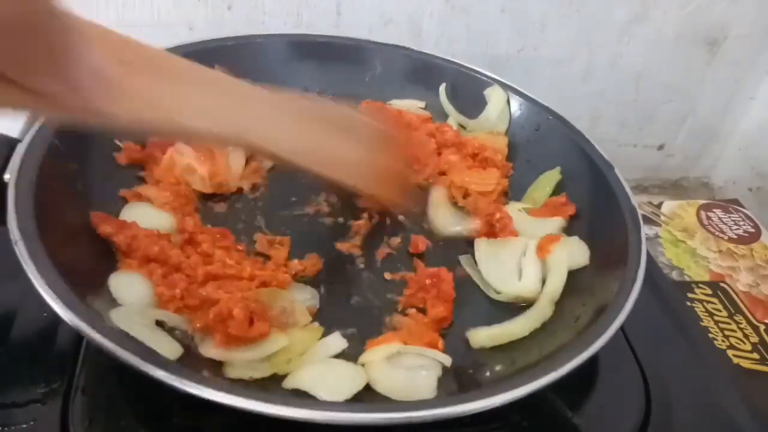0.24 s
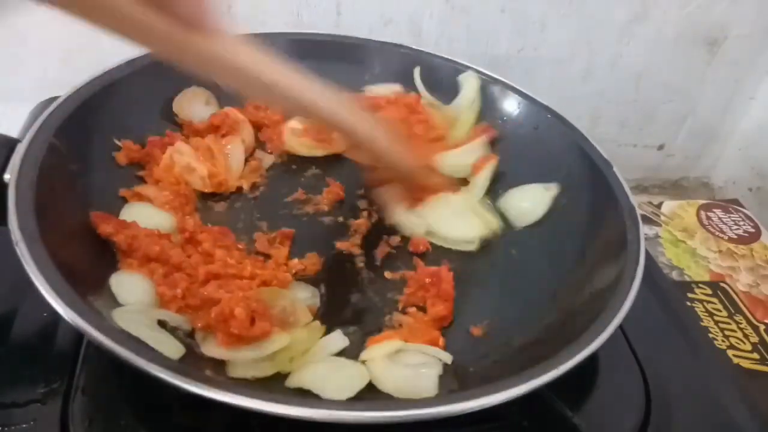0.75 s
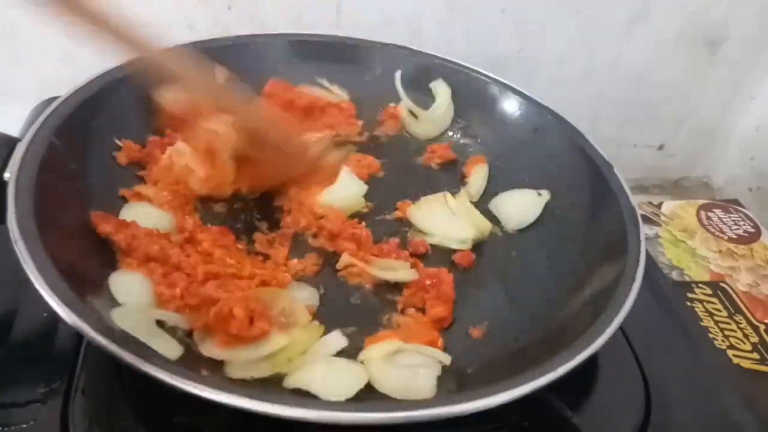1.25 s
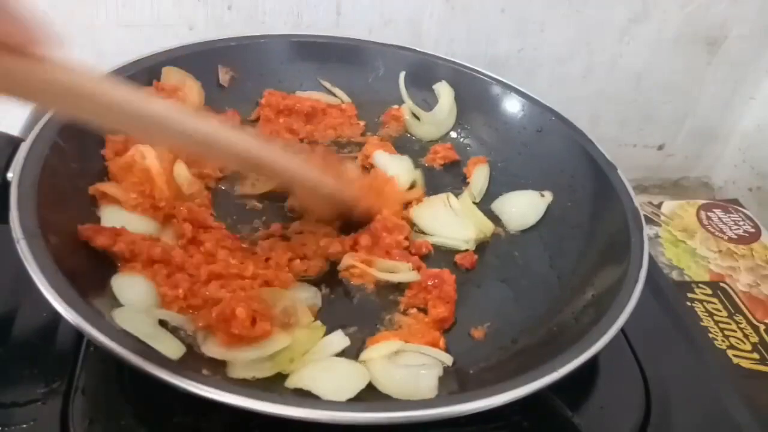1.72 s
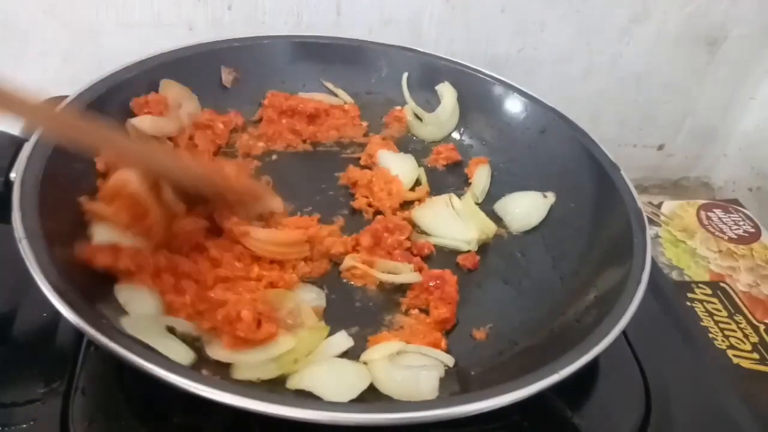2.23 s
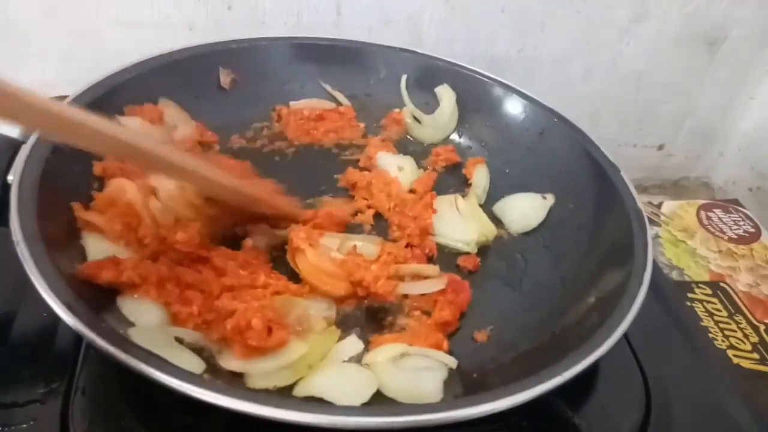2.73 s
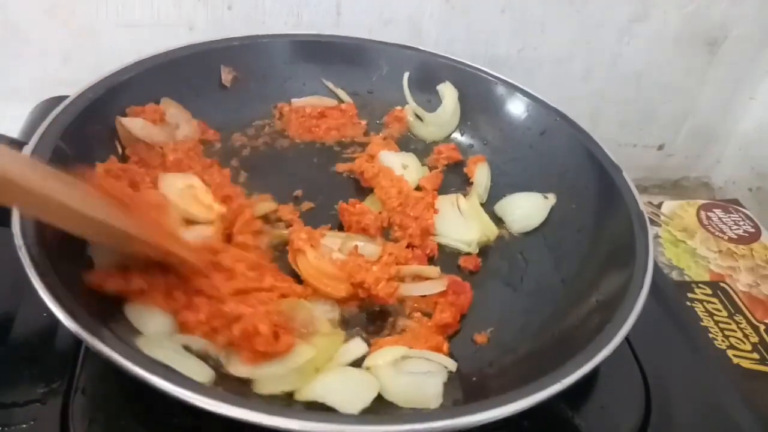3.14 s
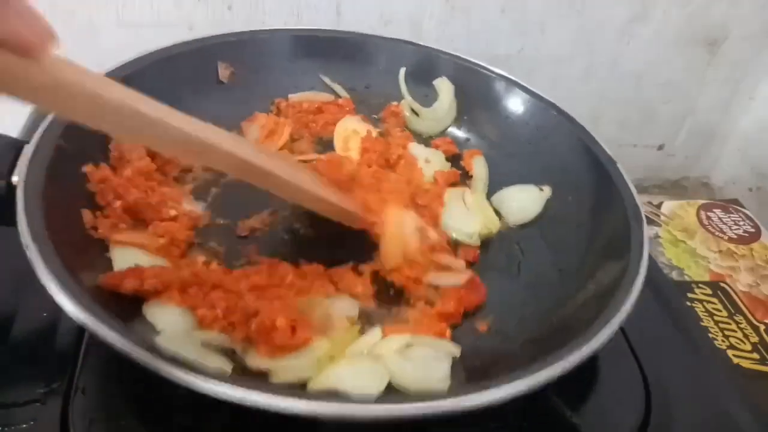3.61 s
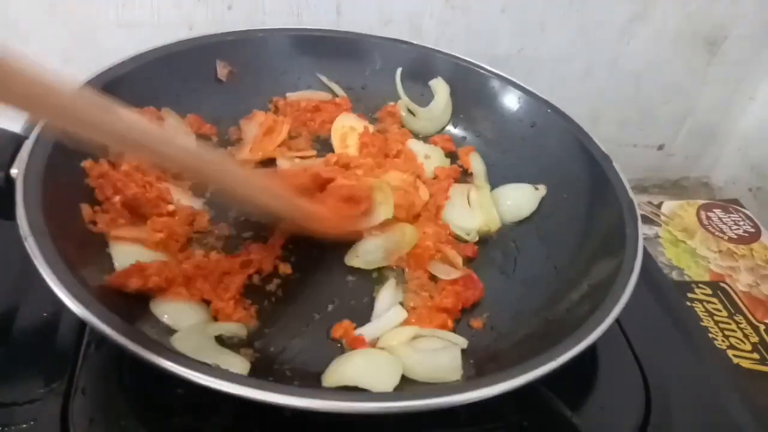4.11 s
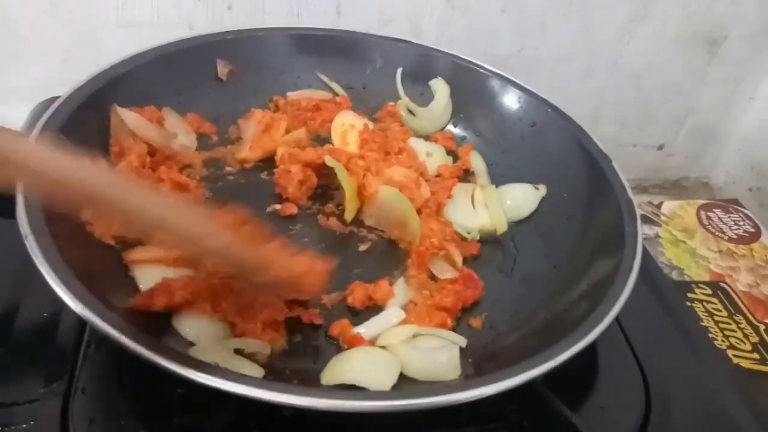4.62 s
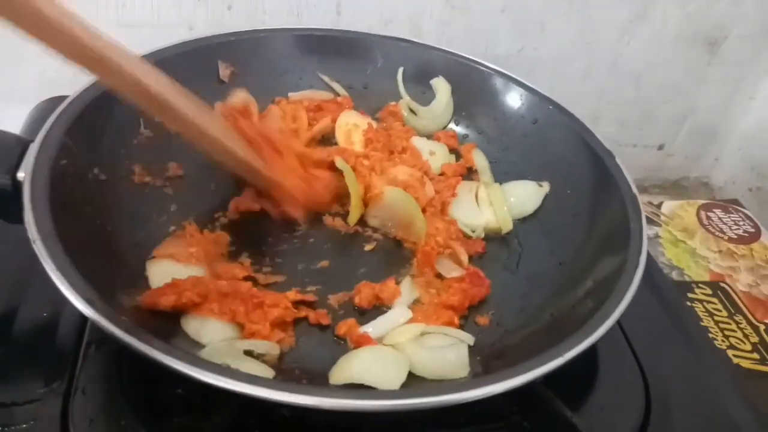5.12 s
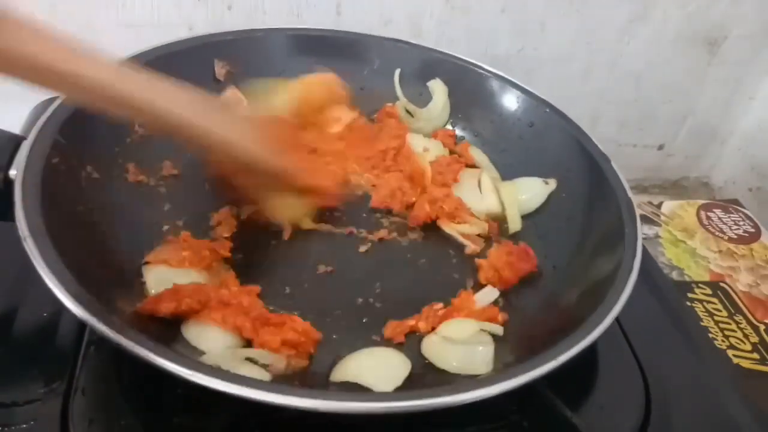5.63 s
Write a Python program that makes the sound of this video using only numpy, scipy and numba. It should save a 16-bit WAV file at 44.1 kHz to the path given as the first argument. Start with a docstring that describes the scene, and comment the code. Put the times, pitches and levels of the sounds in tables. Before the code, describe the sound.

A wooden spatula knocks and scrapes in a wok while food sizzles lightly over a low gas burner rumble.

```python
"""Stir-fry in a wok

Onions and chilli paste fry in a non-stick wok over a rumbling gas burner in a small hard-walled kitchen.
A wooden spatula knocks the pan into ringing, thuds through the food and scrapes over the coating.
Tiny steam bubbles burst in the oil, flaring when the food is turned, and larger drops spit.
A phone close by holds the knocks down with its limiter."""
import sys
import numpy as np
from scipy import signal
from scipy.fft import rfft, irfft
from scipy.io import wavfile
from scipy.ndimage import uniform_filter1d, minimum_filter1d
from numba import njit

SR = 44100
rng = np.random.default_rng(int(sys.argv[2]) if len(sys.argv) > 2 else 0)


def dump_mix(stems):
    """Bounce the given channels to the path in sys.argv[1] as a 16-bit WAV at rate SR."""
    frames = np.atleast_2d(stems).T  # one column per channel
    limited = np.clip(frames, -1, 1)  # hard clip at full scale
    pcm = np.round(limited * 32767).astype(np.int16)
    wavfile.write(sys.argv[1], SR, pcm)


N = 258426
T = np.arange(N) / SR

# Spatula hits. Each row: start in seconds, levels in dB of the blade's flat, its edge and the pan's ring,
# favoured pitch in Hz, ring length (1 rings free, less is choked).
KNOCK_CUES = [(0.2014, -18.5, -10.5, -19.5, 272, 1.0), (0.3502, -10, -42, -20.5, 668, 0.86),
              (0.8232, -12, -20, -21.5, 404, 1.0), (0.8616, -20, -27, -22.5, 280, 0.54),
              (1.247, -11, -23.5, -19.5, 201, 0.83), (1.282, -20, -32, -21.5, 597, 0.78),
              (2.238, -27.5, -35, -29.5, 390, 0.74), (2.6399, -7, -24, -20, 630, 1.0),
              (2.6818, -24.5, -38, -25, 280, 0.81), (3.2611, -28, -24.5, -23.5, 400, 0.5),
              (3.355, -10.5, -25, -20.5, 226, 0.92), (3.3953, -17, -48, -25, 226, 0.83),
              (3.657, -27, -27.5, -25, 226, 0.62), (3.741, -8.5, -23, -16, 350, 0.93),
              (4.0733, -32, -16, -22, 273, 0.97), (4.1258, -7.5, -46, -15.5, 212, 0.77),
              (4.539, -14, -50, -19, 210, 0.9), (5.0747, -14.5, -35, -20.5, 404, 0.69),
              (5.566, -35, -25, -25.5, 226, 0.42), (5.6493, -10.5, -38, -18.5, 417, 0.87)]
# Hits cushioned by food. Each row: start in seconds, level in dB, favoured pitch in Hz.
THUD_CUES = [(0.172, -23.5, 333), (0.184, -28, 252), (2.451, -32.5, 234), (2.623, -26, 366),
             (3.498, -29, 326), (4.231, -22.5, 600), (5.097, -28, 406), (5.373, -41, 650)]
# The voice of the pan. Each row: pitch in Hz, level in dB, free ring time (t60) in seconds.
PAN_MODES = [(94, -12, .5), (226, -3, .35), (273, -5, .3), (345, -3.5, .28), (402, -1.5, .33),
             (432, -7, .25), (470, -8, .22), (512, -10, .22), (577, -6, .28), (656, -2, .24),
             (716, -2, .25), (781, -12, .3), (890, -12, .3), (1000, -14, .25), (1150, -13, .28),
             (1287, -11, .33), (1490, -10, .35), (1675, -2, .27), (1720, -5, .25), (1812, -4, .24),
             (1840, -5, .21), (1881, -4, .22), (1960, -8, .18), (2158, -12, .4), (2355, -14, .25),
             (2660, -17, .25), (2835, -14, .25), (2880, -15, .25), (3290, -13, .25)]
# The wooden blade struck flat, then on its edge. Each row: pitch in Hz, level in dB, t60 in seconds.
BLADE_FLAT_MODES = [(1799, 6.5, 0.016), (3020, -36, .012), (4086, -11, 0.014)]
BLADE_EDGE_MODES = [(2268, 12, 0.0099), (2887, -13, 0.1)]
# Pushes through the food. Each row: start in seconds, length in seconds, scrape in dB, pan rub in dB.
STROKE_CUES = [(0.0, 0.2, -63, -50), (0.58, 0.21, -55.5, -51.5), (1.42, 0.84, -56, -55),
               (2.33, 0.27, -46, -45.5), (2.76, 0.31, -48, -48.5), (3.13, 0.26, -47.5, -71),
               (3.48, 0.1, -46, -62), (4.22, 0.74, -53, -51), (4.60, 0.32, -48, -59),
               (5.14, 0.75, -48.5, -54), (5.46, 0.46, -43.5, -43.5)]
# The frying bed grows as more food meets hot metal. Each row: time in seconds, sizzle in dB, spray in dB.
SIMMER_LEVELS = [(0.0, -52.5, -71), (1.1, -52.5, -68.5), (1.6, -51, -64), (3.0, -51, -66),
                 (4.5, -49.5, -63), (5.0, -51, -66), (5.86, -51.5, -62.5)]
# Wet food turned onto hot metal. Each row: start in seconds, length in seconds, sizzle in dB, spray in dB.
FLARE_CUES = [(0.245, 0.21, -46, -62), (0.386, 0.17, -50, -66), (0.72, .11, -51, -61),
              (0.883, 0.13, -58, -68), (1.177, 0.049, -55, -63), (1.336, 0.084, -50.5, -63),
              (1.782, .10, -50.5, -62), (1.91, 0.057, -59, -62), (2.366, 0.31, -51.5, -77),
              (3.15, 0.12, -48, -62), (3.434, .09, -52, -73), (3.613, 0.17, -47, -58.5),
              (3.763, 0.17, -49.5, -63), (4.082, 0.24, -44.5, -56.5), (4.307, 0.37, -49.5, -62),
              (4.596, .12, -62, -64), (4.805, 0.082, -52, -66), (5.313, .07, -53, -60),
              (5.459, 0.3, -43, -61), (5.75, 0.19, -49.5, -65)]
# Loud spits of oil. Each row: start in seconds, level in dB.
SPIT_CUES = [(0.606, -26.5), (0.9523, -29), (1.534, -32), (1.6115, -29), (1.821, -33), (2.0338, -29.5),
             (2.2543, -27.5), (3.4663, -33), (3.4875, -25), (4.0516, -30), (4.3837, -34), (4.9968, -31.5),
             (5.3355, -35), (5.4806, -26.5)]
# The rise and fall of the gas flame. Each row: time in seconds, level in dB.
FLAME_LEVELS = [(0.0, -34), (0.8, -40.5), (1.7, -38.5), (2.5, -37.5), (3.0, -41.5), (3.5, -39),
                (4.1, -45.5), (5.0, -41.5), (5.86, -47)]
# Tone curves for the noises. Each row: frequency in Hz, relative level in dB.
CRACK_EQ = [(200, -10), (700, -1.5), (1500, 5), (2600, 0), (4100, 1.5), (5300, -14), (6700, -9),
            (8000, -32.5), (15000, -50)]  # dry attack of the wood
CLATTER_EQ = [(120, -25), (220, 9.5), (450, 4.5), (750, 0.5), (1050, -1.5), (1500, -4), (1850, -0.5),
              (2300, -9), (3200, -10), (4100, -15), (5200, -21.5), (6700, -27), (8500, -45), (15000, -63)]  # crowd of weaker modes of pan and stove
SCRAPE_EQ = [(250, -17), (600, 1), (1000, 6), (1400, -2.5), (2200, 8.5), (3000, 0), (4500, 0.5),
             (8000, -55)]  # midrange rasp of the blade
SIZZLE_EQ = [(300, -19.5), (900, -12.5), (1600, -6), (2400, -9), (3000, -0.5), (3650, -5), (4000, 5),
             (4350, -3.5), (5000, -2), (5600, -8), (6700, -11), (7800, -21.5), (10000, -37), (16000, -26.5)]  # bright fizz of bubbles
SPRAY_EQ = [(4000, 0.5), (7500, 4), (10000, 1), (13000, 0.5), (16000, -5.5)]  # airy top of the fine spray
SPIT_EQ = [(300, -21), (1200, -16), (2500, -5.5), (4000, 4), (5200, -3.5), (6700, -17.5), (8000, -47),
           (16000, -51)]  # snap of bursting drops
ROAR_EQ = [(13, -31), (22, -20), (32, -25), (64, -12.5), (93, -0.5), (108, -0.5), (122, -1.5), (146, -9.5),
           (208, -15), (237, -16.5), (295, -28), (350, -30.5), (400, -40), (520, -34.5), (880, -120)]  # low rumble of the flame


def knocks():
    """The blade cracks and clacks briefly; the pan and its support take up the blow and ring on."""
    t = T[:SR // 2]
    wood, ring = np.zeros(N), np.zeros((2, N))
    for start, flat_db, edge_db, ring_db, focus_hz, length in KNOCK_CUES:
        flat, edge = undb(flat_db), undb(edge_db)
        blade = flat * clack(t, BLADE_FLAT_MODES) + edge * clack(t, BLADE_EDGE_MODES)
        crack = colour(rng.standard_normal(len(t)), CRACK_EQ)[0] * fade(t, 0.03)
        add(wood, start, blade + undb(-4.5) * np.hypot(flat, edge) * crack)
        centre, sides = rng.standard_normal(len(t)), rng.standard_normal((2, len(t)))
        clatter = colour(centre + 1.02 * sides, CLATTER_EQ) * fade(t, 0.3)
        modes = pan_ring(t, focus_hz, focus_db=6.5, scatter_db=1.5, width=1.23)
        body = undb(-3.5) * modes + undb(-1.0) * clatter
        # a blade that stays pressed on the pan chokes it
        damping = fade(t * max(1 / length - 1, 0), 0.37)
        attack = 1 - np.exp(-t / 0.0095)
        add(ring, start, undb(ring_db) * body * damping * attack)
    return (kitchen(wood, wet_db=-6.5, t60=0.31, left_db=7.0)
            + kitchen(ring, wet_db=-44, t60=0.61, left_db=7.5))


def clack(t, modes):
    """The wooden blade's modes speak fast and die quickly."""
    attack = 1 - np.exp(-t / 0.00077)
    return attack * sum(undb(db) * np.sin(2 * np.pi * hz * t) * fade(t, t60) for hz, db, t60 in modes)


def pan_ring(t, focus_hz, focus_db, scatter_db, width):
    """The pan's modes after a blow; the place of contact favours those near one pitch."""
    hz, db, t60 = np.transpose(PAN_MODES)[:, :, None]
    favour_db = focus_db * np.exp(-(np.log(hz / focus_hz) / 0.077) ** 2)
    envelopes = undb(db + favour_db + scatter_db * rng.standard_normal(hz.shape)) * fade(t, t60)
    phase = 2 * np.pi * hz * t + rng.uniform(0, 2 * np.pi, hz.shape)
    # high modes reach the two microphones out of step
    skew = width * np.sqrt(hz / hz.max()) * rng.standard_normal(hz.shape)
    return np.array([np.sum(envelopes * np.sin(phase + side * skew), axis=0) for side in (-1, 1)])


def thuds():
    """Food between blade and pan lengthens the push, so only low modes answer."""
    t = T[:SR // 2]
    track = np.zeros((2, N))
    for start, db, focus_hz in THUD_CUES:
        bump = np.sin(2 * np.pi * focus_hz * t) * fade(t, 0.029)
        rattle = colour(rng.standard_normal(len(t)), CLATTER_EQ) * fade(t, 0.1)
        ring = pan_ring(t, focus_hz, focus_db=15, scatter_db=4.0, width=0.56) * fade(t, 0.68)
        blow = undb(2.0) * bump + undb(0.5) * rattle + undb(-12) * ring
        cushion = signal.butter(4, 1.52 * focus_hz, fs=SR, output="sos")
        add(track, start, undb(db) * signal.sosfilt(cushion, blow))
    return kitchen(track, wet_db=-1.5, t60=0.3, left_db=7.0)


def sizzle():
    """Steam bubbles burst all over the oil: a dense fizz, sparser crackle and a fine spray."""
    fry_gain, spray_gain = frying()
    bubbles = colour(fizz(per_s=4000, spread_db=1.5, cap_db=9.0, t60=0.007), SIZZLE_EQ)
    crackle = colour(fizz(per_s=90, spread_db=3.5, cap_db=9, t60=0.009), SPIT_EQ)
    spray = colour(fizz(per_s=5900, spread_db=3.5, cap_db=8, t60=0.0054), SPRAY_EQ)
    oil = fry_gain * (undb(6) * bubbles + undb(3.5) * crackle) + undb(4.5) * spray_gain * spray
    return kitchen(oil, wet_db=-6.5, t60=0.14, left_db=4.0)


def frying(fry_flutter_db=0.26, spray_flutter_db=-1.9):
    """Gains of sizzle and spray: an uneven simmer that flares when food is turned."""
    fry_bed, spray_bed = gains(SIMMER_LEVELS)
    flutter = wander(rate_hz=14)
    fry_flares = [(start, length, db) for start, length, db, _ in FLARE_CUES]
    spray_flares = [(start, length, db) for start, length, _, db in FLARE_CUES]
    return (swells(fry_bed * undb(fry_flutter_db * flutter), fry_flares),
            swells(spray_bed * undb(spray_flutter_db * flutter), spray_flares))


def spits():
    """Larger drops of water burst with a single snap."""
    t = T[:SR // 25]
    track = np.zeros((2, N))
    for start, db in SPIT_CUES:
        snap = colour(rng.standard_normal((2, len(t))), SPIT_EQ) * fade(t, 0.014)
        add(track, start, undb(db + 3.5) * snap)
    return kitchen(track, wet_db=-9.0, t60=0.5, left_db=4.0)


def scraping():
    """The blade sticks and slips over the coating, rasping and rubbing the pan into a low hum."""
    scrape_gain, rub_gain = stirring()
    rasp = colour(fizz(per_s=1200, spread_db=6.0, cap_db=21.0, t60=0.006), SCRAPE_EQ)
    t = T[:SR // 2]
    # the pressed blade shortens the ring
    modes = pan_ring(t, focus_hz=417, focus_db=3.5, scatter_db=1.5, width=0.18) * fade(t, 0.22)
    hum = convolve(pops(per_s=710, spread_db=4, cap_db=8.5), modes)
    hum = unit(signal.sosfilt(signal.butter(3, 800, fs=SR, output="sos"), hum))
    return (kitchen(undb(-2.0) * scrape_gain * rasp, wet_db=0.5, t60=0.56, left_db=10)
            + kitchen(undb(-5.0) * rub_gain * hum, wet_db=-20, t60=0.35, left_db=10))


def stirring(rest_scrape_db=-52.5, rest_rub_db=-65, skid_s=0.23):
    """Gains of scrape and rub: a barely touching blade, its strokes and a skid after every knock."""
    skids = [(start, skid_s, ring_db - 33.5, ring_db - 23.5) for start, _, _, ring_db, _, _ in KNOCK_CUES]
    moves = STROKE_CUES + skids
    scrape = swells(undb(rest_scrape_db), [(start, length, db) for start, length, db, _ in moves])
    rub = swells(undb(rest_rub_db), [(start, length, db) for start, length, _, db in moves])
    return scrape, rub


def burner(flicker_db=2.5):
    """The gas flame flickers and rumbles under the pan, nearly one signal, louder on the left."""
    roar = colour(rng.standard_normal(N) + 0.12 * rng.standard_normal((2, N)), ROAR_EQ)
    flicker = undb(flicker_db * wander(rate_hz=8))
    return gains(FLAME_LEVELS)[0] * flicker * roar * undb([[3], [-6.5]])


def kitchen(x, wet_db, t60, left_db, mic_lag_s=0.0001):
    """Direct sound reaches the right microphone first; wall reflections differ at the two."""
    t = T[:SR // 2]
    walls = rng.standard_normal((2, len(t))) * fade(t, t60) * (1 - np.exp(-(t / 0.0006) ** 2))
    walls /= np.sqrt(np.sum(walls ** 2, axis=1, keepdims=True))
    x = np.broadcast_to(x, (2, N))
    late_left = np.interp(T - round(mic_lag_s * SR) / SR, T, x[0])
    direct = np.array([late_left, x[1]])
    balance = undb(np.array([[left_db], [-left_db]]) / 2)
    return (direct + undb(wet_db) * convolve(x, walls)) * balance


def fizz(per_s, spread_db, cap_db, t60):
    """Tiny bursts of noise that both microphones hear at the same moments, each by its own paths."""
    energy = convolve(pops(per_s, spread_db, cap_db) ** 2, fade(T[:SR // 20], t60) ** 2)
    return np.sqrt(np.abs(energy)) * rng.standard_normal((2, N))


def pops(per_s, spread_db, cap_db):
    """Random tiny impulses, most faint and a few strong."""
    size = undb(np.minimum(spread_db * rng.exponential(size=N), cap_db))
    return (rng.random(N) < per_s / SR) * size * rng.choice([-1, 1], N)


def wander(rate_hz):
    """A slow drift that glides from one random value to the next."""
    steps = rng.standard_normal(512)
    return 0.88 * np.interp(T * rate_hz, np.arange(len(steps)), steps)


def swell(start, length, rise_share=0.28):
    """Envelope that rises to 1 and dies away again."""
    return np.sin(np.pi * np.interp((T - start) / length, [0, rise_share, 1], [0, .5, 1]))


def swells(rest, events):
    """A resting gain with (start, length, dB) swells on top, added by power."""
    return np.sqrt(rest ** 2 + sum((undb(db) * swell(start, length)) ** 2 for start, length, db in events))


def gains(table):
    """One fader curve for each dB column."""
    times, *columns = np.transpose(table)
    return [undb(np.interp(T, times, db)) for db in columns]


def colour(x, eq, size=8192):
    """Minimum-phase EQ through (Hz, dB) points; the result has rms 1."""
    hz, db = np.transpose(eq)
    bin_hz = np.arange(size // 2 + 1) * SR / size
    curve = undb(np.interp(np.log(bin_hz + 1), np.log(hz), db))
    cepstrum = irfft(np.log(curve))
    # folding the cepstrum keeps the filter from ringing ahead of an attack
    cepstrum[1:size // 2] *= 2
    cepstrum[size // 2 + 1:] = 0
    return unit(convolve(x, irfft(np.exp(rfft(cepstrum)))))


def convolve(x, response):
    """Pass sound through a response, keeping its length."""
    return signal.fftconvolve(np.atleast_2d(x), np.atleast_2d(response), axes=-1)[:, :x.shape[-1]]


def add(track, start, sound):
    """Mix a sound in at a time in seconds."""
    i = max(int(start * SR), 0)
    track[..., i:i + sound.shape[-1]] += sound[..., :N - i]


def fade(t, t60):
    """Ring-down that loses 60 dB in t60 seconds."""
    return np.exp(-np.log(1000) * t / t60)


def undb(db):
    """Decibels to gain."""
    return 10 ** (np.asarray(db) / 20)


def unit(x):
    """Scale to rms 1."""
    return x / np.sqrt(np.mean(x ** 2))


@njit
def follow(x, release):
    """Peak follower: instant rise, slow fall."""
    envelope, peak = np.empty(len(x)), 0.
    for i in range(len(x)):
        peak = max(x[i], peak * release)
        envelope[i] = peak
    return envelope


def limit(x, ceiling_db, release_s, window=64):
    """Look-ahead limiter that ducks both channels together."""
    peak = follow(np.abs(x).max(axis=0), np.exp(-1 / (release_s * SR)))
    gain = np.minimum(1, undb(ceiling_db) / (peak + 1e-9))
    return x * uniform_filter1d(minimum_filter1d(gain, window), window)


def scene():
    """The stereo mix of spatula, pan, oil and flame."""
    return knocks() + thuds() + sizzle() + spits() + scraping() + burner()


def record(dry):
    """The phone limits the knocks and cuts the highest treble."""
    held = limit(dry, ceiling_db=-6.5, release_s=0.1)
    high_cut = signal.ellip(10, .2, 80, 15700, fs=SR, output="sos")
    return signal.sosfilt(high_cut, held)


dry = scene()
out = record(dry)
dump_mix(out)
```